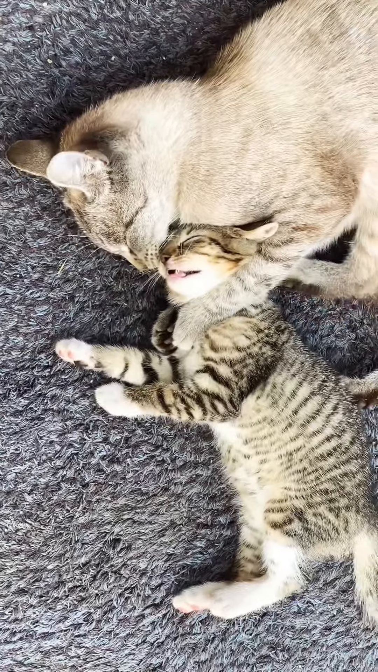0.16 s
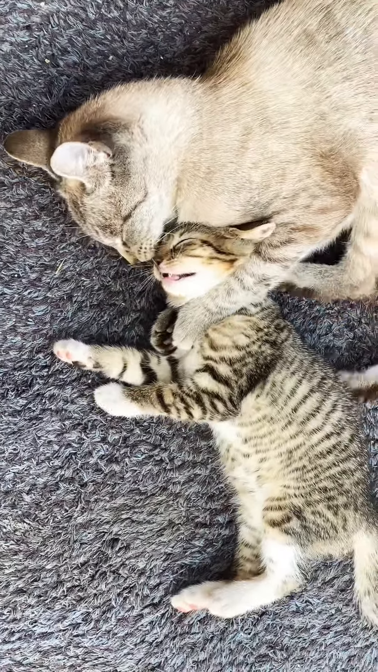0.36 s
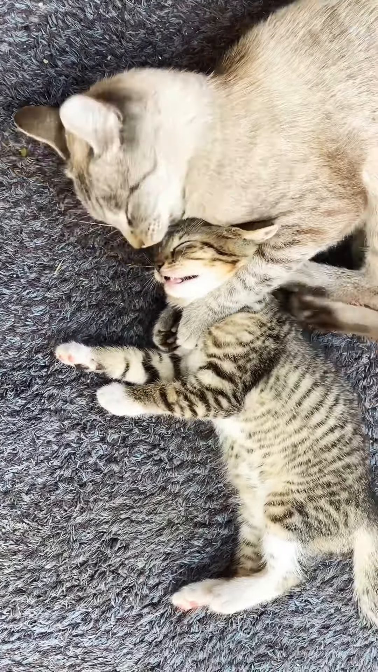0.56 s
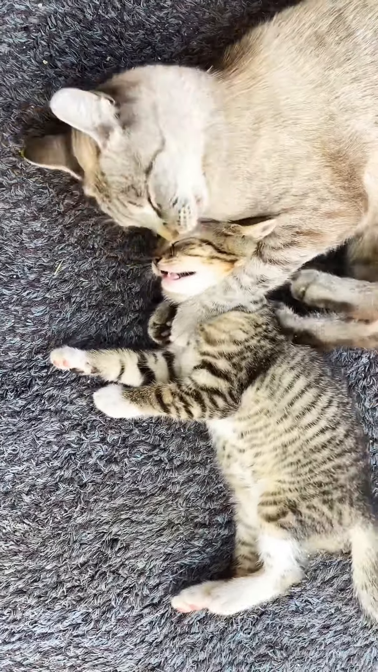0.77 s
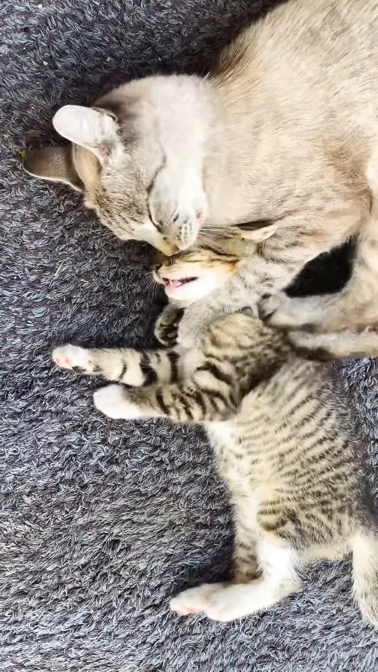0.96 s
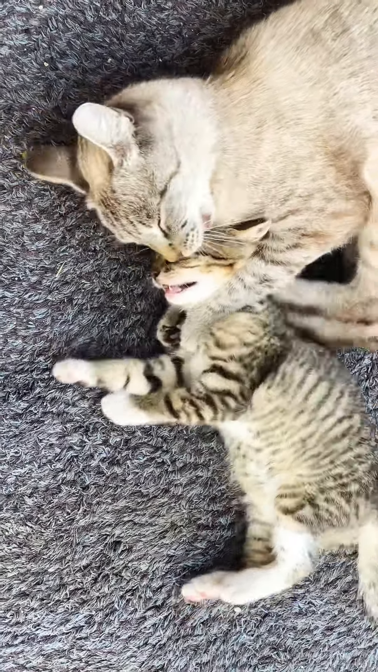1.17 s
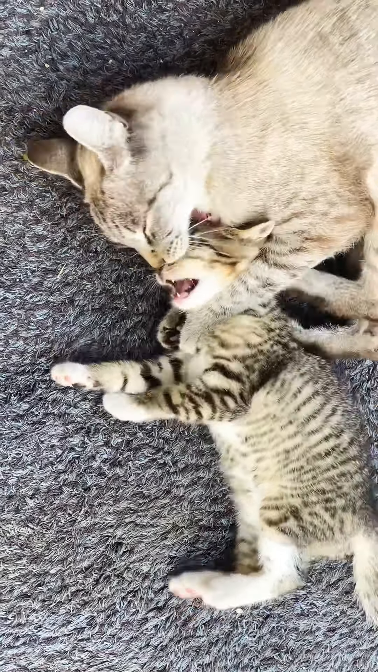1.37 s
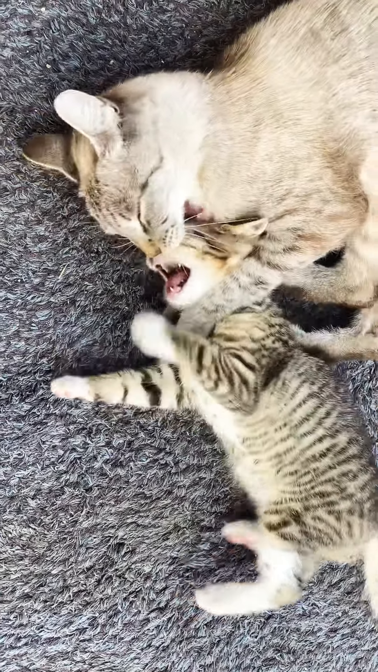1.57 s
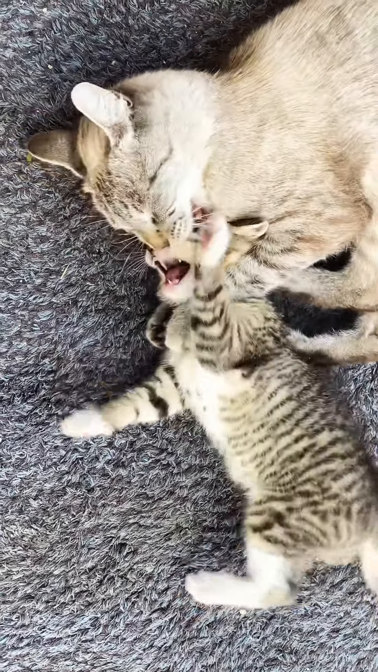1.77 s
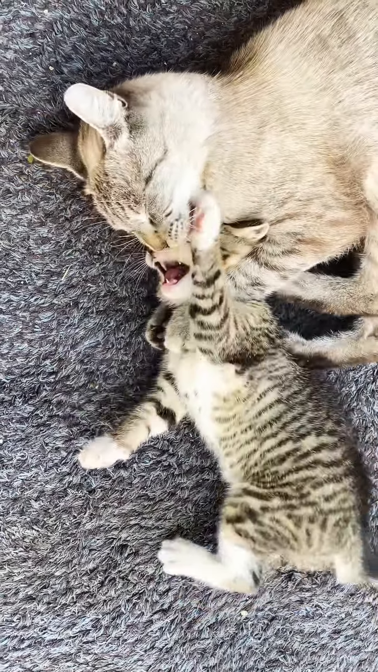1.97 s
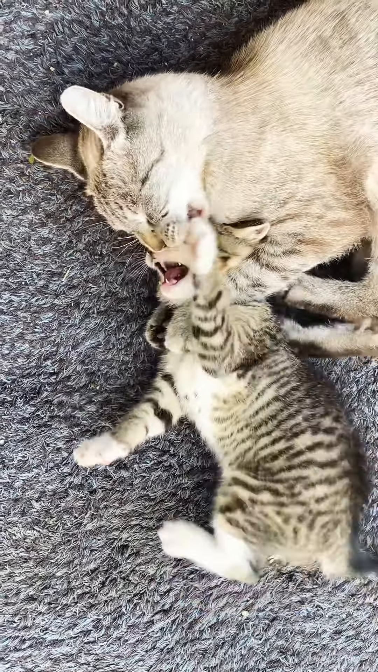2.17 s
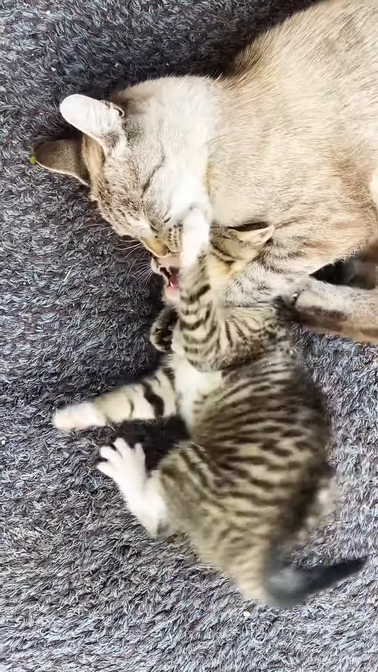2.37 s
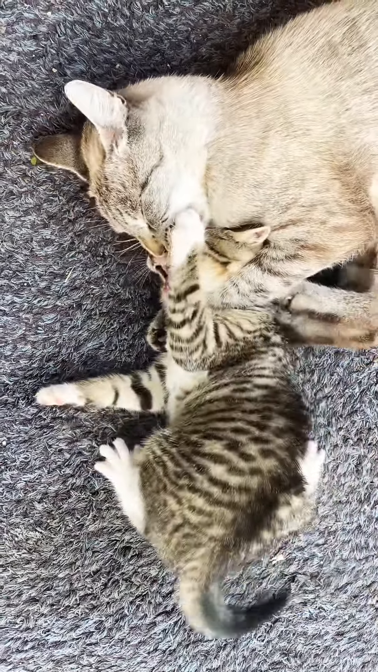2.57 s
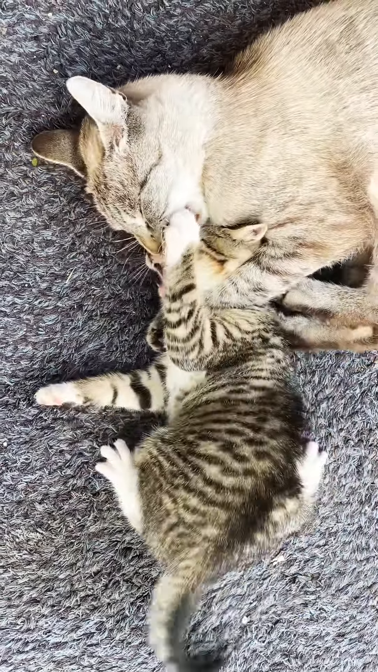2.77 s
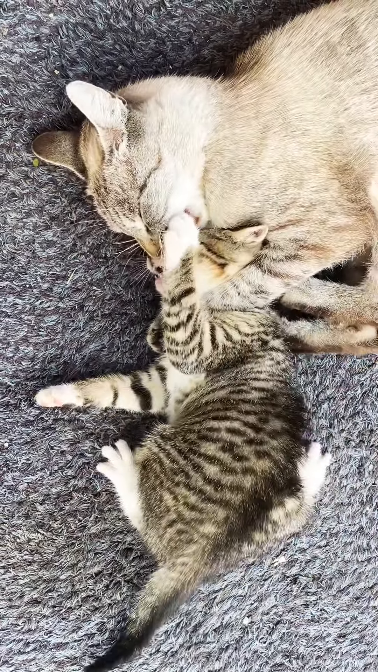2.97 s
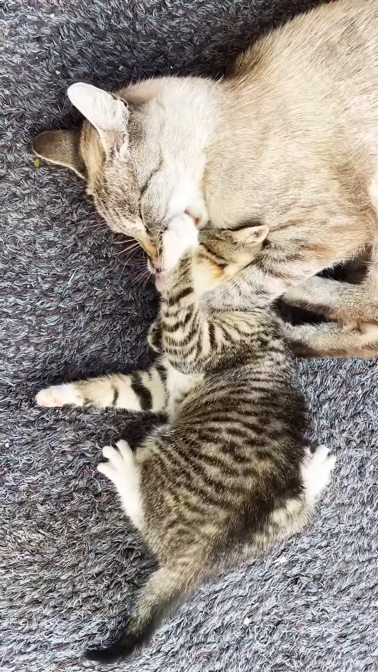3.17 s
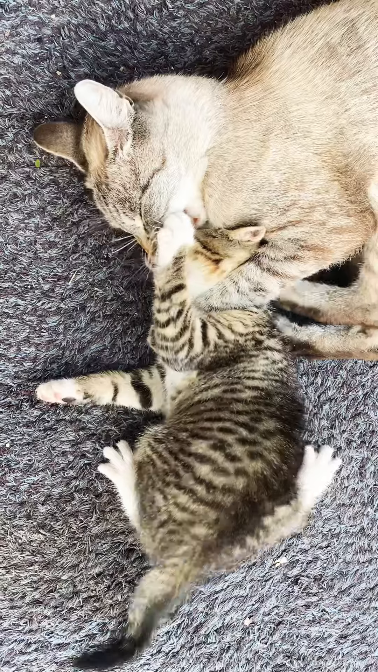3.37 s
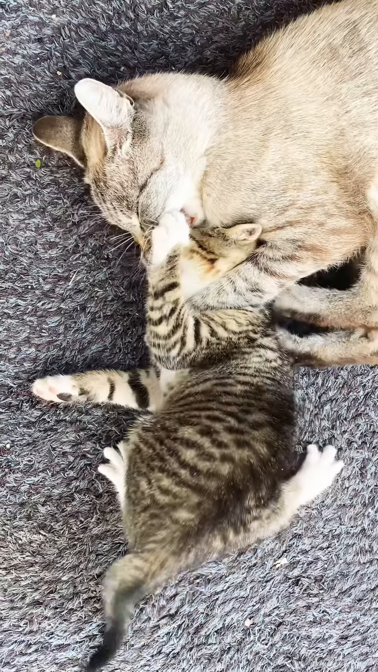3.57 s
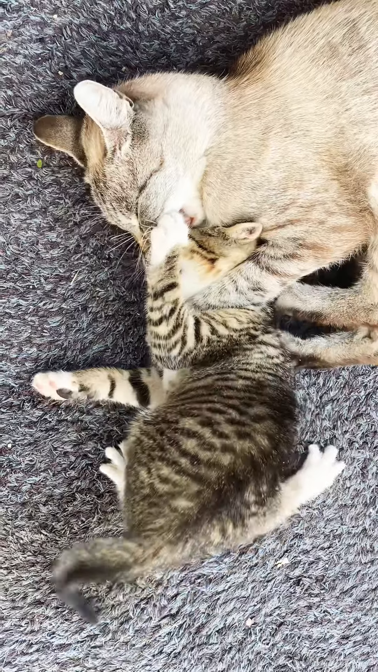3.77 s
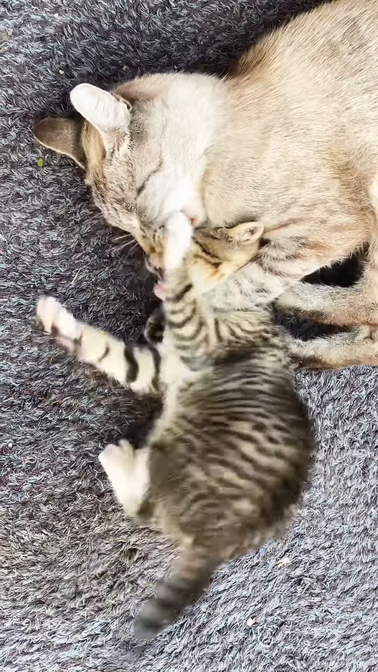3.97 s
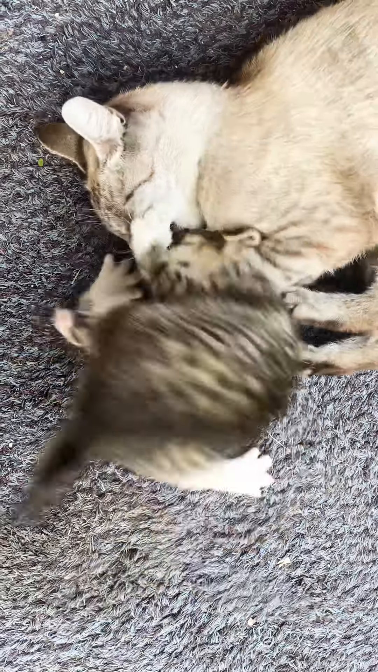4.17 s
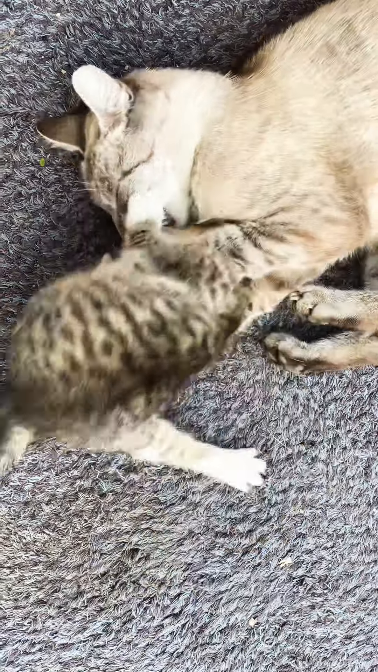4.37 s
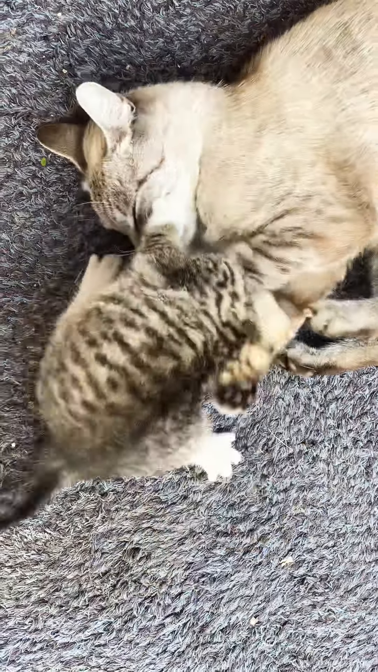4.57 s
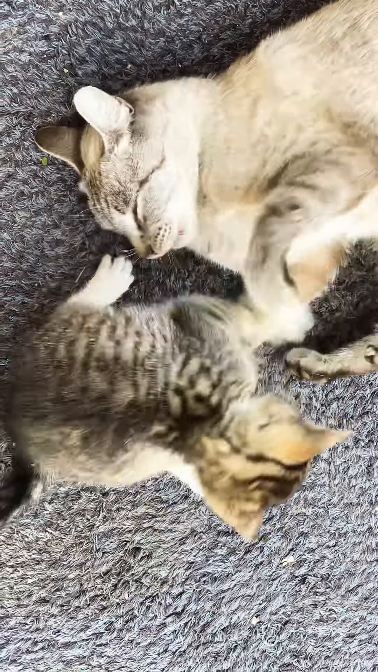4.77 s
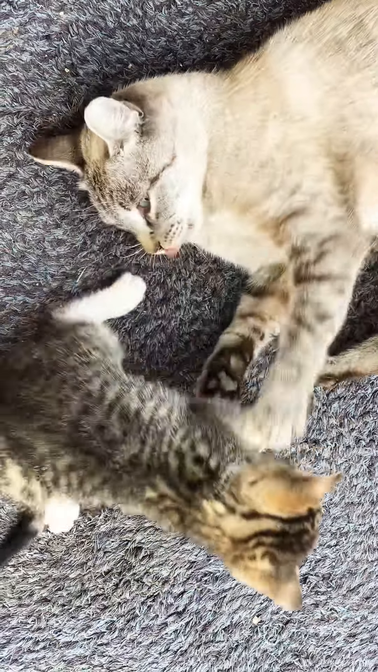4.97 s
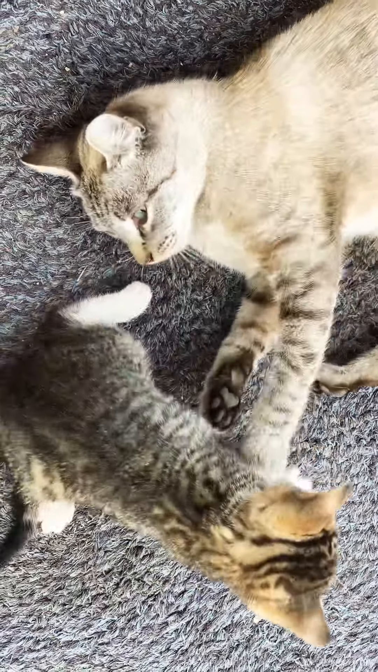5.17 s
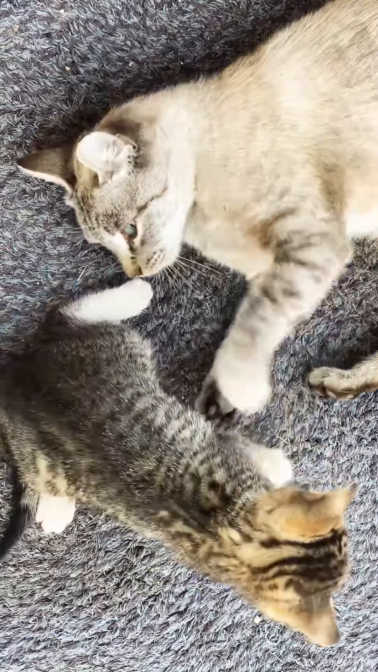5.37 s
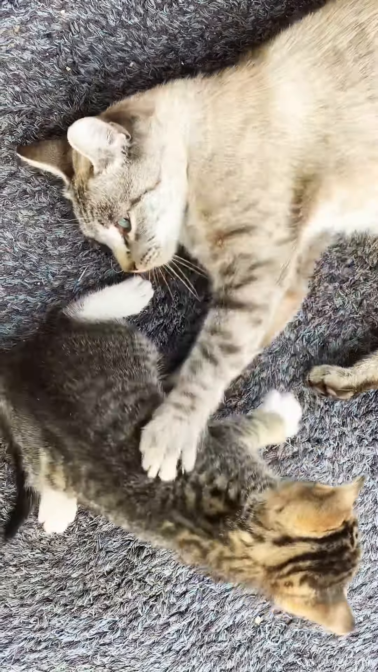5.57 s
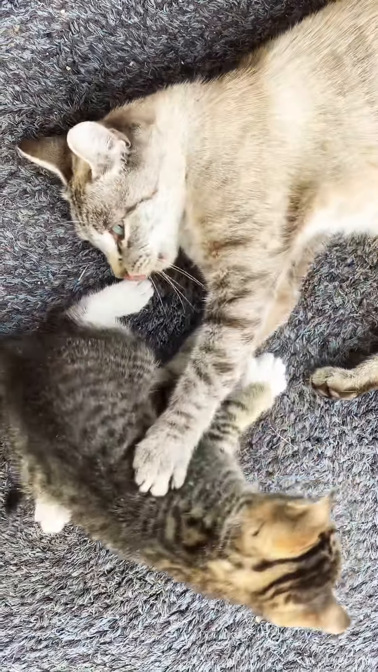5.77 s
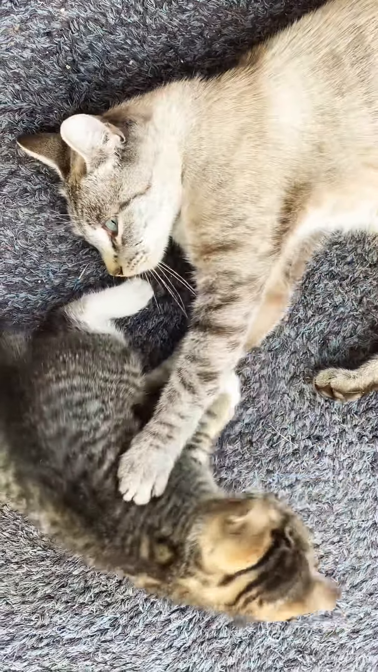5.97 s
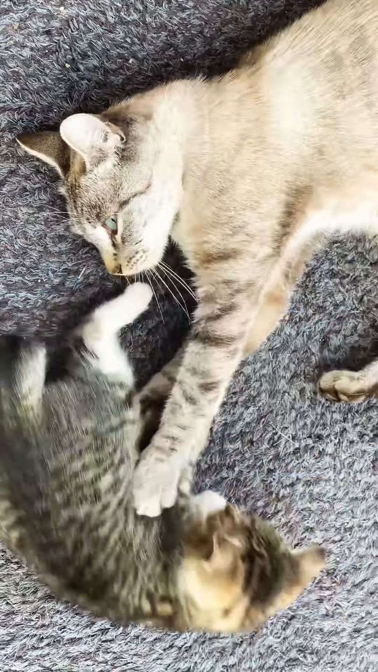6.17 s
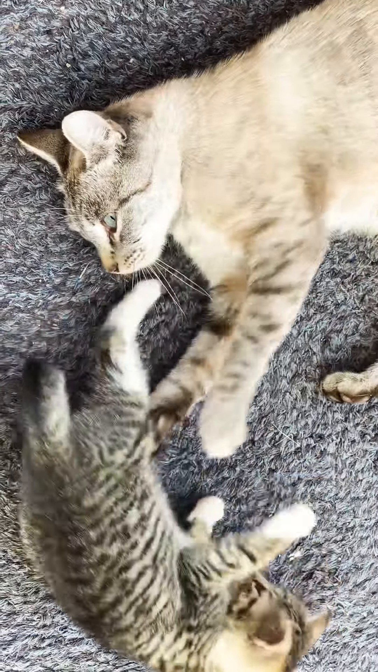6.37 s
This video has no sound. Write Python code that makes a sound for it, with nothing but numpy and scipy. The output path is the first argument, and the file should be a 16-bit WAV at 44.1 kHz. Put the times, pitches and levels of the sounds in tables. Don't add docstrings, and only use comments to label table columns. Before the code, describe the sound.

Two small piercing kitten mews, each starting hoarse and sagging at the end, over faint low rumble, followed by a sniff and light tussling on carpet.

```python
import sys
import numpy as np
from scipy import signal
from scipy.fft import rfft, irfft
from scipy.io import wavfile
from scipy.ndimage import uniform_filter1d

SR = 44100
rng = np.random.default_rng(int(sys.argv[2]) if len(sys.argv) > 2 else 0)


def generate_wav(sig):
    pcm = np.round(np.clip(np.atleast_2d(sig).T, -1, 1) * 32767).astype(np.int16)
    wavfile.write(sys.argv[1], SR, pcm)


def volts_from_db(level):
    exponent = np.asarray(level, float) / 20
    return 10 ** exponent


N = 283122

# hz, level_db
THROAT_COLOUR = [(680, -23.5), (1000, -19.5), (1330, -14), (1700, -21.5), (2050, -19.5), (2500, -24.5),
                 (3300, -7.5), (4200, -3.5), (5200, -4.5), (6000, -14), (7500, -16), (8300, -44),
                 (12800, -47.5), (14500, -42)]


def evened(x):
    return x / np.sqrt(np.mean(x ** 2) + 1e-20)


def read(points, hz):
    f, value = np.transpose(points)
    return np.interp(np.log(hz + 1), np.log(f + 1), value)


def along(rows):
    s, db = np.transpose(rows)
    return volts_from_db(np.interp(np.arange(N) / SR, s, db))


def add(mix, s, sound):
    part = mix[round(s * SR):][:len(sound)]
    part += sound[:len(part)]


def drift(count, size):
    once = uniform_filter1d(rng.standard_normal(count), size)
    return evened(uniform_filter1d(once, size))


def resonate(x, hz, width):
    turn = np.exp(2j * np.pi * np.cumsum(hz * np.ones(len(x))) / SR)
    r = np.exp(-np.pi * width / SR)
    once = signal.lfilter([1 - r], [1, -r], x / turn)
    twice = signal.lfilter([1 - r], [1, -r], once)
    return 2 * (turn * twice).real


def coloured(x, points):
    hz = np.fft.rfftfreq(len(x), 1 / SR)
    colour_db = read([(points[0][0] / 2, -90)] + points, hz)
    return irfft(rfft(x) * volts_from_db(colour_db), len(x))


def bed(points, patchy_db, flicker_db):
    # hz, correlation
    likeness = [(60, 0.79), (130, 0.9), (290, 0.72), (640, -0.52), (1100, -0.27), (1800, 1), (3000, 0.35),
                (10000, 0.83), (13000, .7), (15500, 0.98)]
    frames, hz = N // 256 + 5, np.fft.rfftfreq(1024, 1 / SR)
    a, b, c, d, patches = rng.standard_normal((frames, 513, 5)).T
    patches = evened(uniform_filter1d(uniform_filter1d(patches, 10, 0), 10, 1))
    same = np.clip(read(likeness, hz), -1, 1)[:, None]
    left = a + 1j * b
    right = same * left + np.sqrt(1 - same ** 2) * (c + 1j * d)
    level_db = read(points, hz)[:, None] + patchy_db * patches + flicker_db * drift(frames, size=6)
    z = np.array([left, right]) * volts_from_db(level_db)
    return evened(signal.istft(z, nperseg=1024, noverlap=768)[1][:, :N])


def background():
    # hz, level_db_per_hz
    rumble_colour = [(15, -22), (30, -12.5), (62, 2.5), (100, -7.5), (160, -15), (260, -30.5)]
    # centre_s, peak_db
    jolts = [(.62, -61.5), (.84, -53.5), (1.0, -58.5), (1.359, -60), (2.14, -58), (2.841, -61), (3.62, -60),
             (3.85, -60), (4.13, -60.5), (4.95, -59), (5.25, -61), (5.58, -54), (5.79, -55.5),
             (6.08, -53.5), (6.221, -56.5)]
    # time_s, level_db
    scuff_level = [(0, -100), (.65, -83), (.75, -73), (.9, -95), (4, -80), (4.2, -79.5), (4.6, -78.5),
                   (4.75, -77), (4.95, -77), (5.1, -83.5), (5.4, -77.5), (5.55, -68), (5.75, -75.5),
                   (6, -72.5), (6.15, -77), (6.3, -72), (6.42, -76.5)]
    # hz, level_db_per_hz
    scuff_colour = [(100, -9), (250, -1), (600, 0), (1100, -2), (1600, -21), (3000, -32), (6000, -41)]
    # hz, level_db_per_hz
    air_colour = [(60, -13.5), (130, -2.5), (250, -5), (450, -7), (900, -10), (1500, -18), (2300, -24.5),
                  (4000, -27), (7000, -31.5), (11500, -36), (13500, -29.5), (15100, -24.5), (15800, -30)]
    rumble_db, lumps_db, follows_scuff, air_db = -66.5, 2.5, .3, -74
    jolt_s = 0.028

    t, moving = np.arange(N) / SR, along(scuff_level)
    level = volts_from_db(rumble_db + lumps_db * drift(N, size=2500)) * (moving / volts_from_db(-82.5)) ** follows_scuff
    jolt_power = sum(volts_from_db(2 * db) * np.exp(-((t - s) / jolt_s) ** 2) for s, db in jolts)
    level = np.sqrt(level ** 2 + jolt_power)
    rumble = level * evened(coloured(rng.standard_normal(N), rumble_colour + [(500, -93.5)]))
    scuff = moving * bed(scuff_colour + [(12000, -70)], patchy_db=1.6, flicker_db=1.2)
    air = bed(air_colour, patchy_db=1.1, flicker_db=.6)
    return rumble + scuff + volts_from_db(air_db) * air


def room(x):
    # hz, t60_s
    decay = [(400, 0.53), (2000, 0.31), (5000, .14), (12000, 0.12)]
    taps = np.zeros(SR // 4)
    at = np.arange(200, SR // 4 - 20, 20)
    taps[at + rng.integers(0, 20, at.shape)] = rng.choice([-1., 1.], at.shape)
    hz, t, z = signal.stft(taps, SR, nperseg=256)
    fade = volts_from_db(-60 * t / read(decay, hz)[:, None])
    tail = signal.istft(z * fade, SR, nperseg=256)[1]
    return signal.fftconvolve(x, tail / np.linalg.norm(tail))[:N]


def knock(s, peak_db, hz, width, t60, rise, tail_db):
    t = np.arange(round(.2 * SR)) / SR
    strike = t / rise * np.exp(1 - t / rise)
    rustle = volts_from_db(tail_db - 60 * t / t60) * np.minimum(t / rise, 1)
    blow = (strike + rustle) * resonate(rng.standard_normal(len(t)), hz, width)
    return s - rise, volts_from_db(peak_db) * blow / abs(blow).max()


def sniff():
    # time_s, centre_hz, level_db
    glide = [(4.299, 5830, -102), (4.33, 5300, -85), (4.381, 4560, -82.5), (4.43, 3410, -78.5),
             (4.469, 3170, -89)]
    s, hz, db = np.transpose(glide)
    t = np.arange(s[0], s[-1], 1 / SR)
    hiss = resonate(rng.standard_normal(len(t)), np.interp(t, s, hz), 1200)
    return s[0], volts_from_db(np.interp(t, s, db)) * evened(hiss)


def folds(hz, step, rough, size):
    order = np.arange(step, 16000 / hz.min(), step)[:, None]
    jitter = 0.021 * rough * drift(len(hz), size=60) + 0.0039 * drift(len(hz), size=400)
    turns = np.cumsum(hz * (1 + jitter)) / SR
    chance = rng.standard_normal((len(hz) // 16 + 2, len(order), 2)) @ [1, 1j]
    chance = uniform_filter1d(uniform_filter1d(chance, size, 0), size, 0).T
    share = np.clip(rough * order * hz.mean() / 4000, rough ** 2, .95)
    wander = np.sqrt(1 - share ** 2) + share * chance / np.sqrt(np.mean(abs(chance) ** 2))
    wander = uniform_filter1d(wander[:, np.arange(len(hz)) // 16], size=16, axis=1)
    smear = 1.5 * rng.standard_normal(order.shape)
    wave = (wander * np.exp(1j * (2 * np.pi * order * turns + smear))).real
    return order, turns, np.sqrt(2) * wave * (order * hz < 16000)


def rasp(start, end, from_hz, to_hz, alternate, rough, effort_db, ring_hz):
    count = round((end - start + .004) * SR)
    hz = np.linspace(from_hz, to_hz, count)
    order, _, waves = folds(hz, .5, rough, size=7)
    place = order * hz
    mode_hz = ring_hz * (1 + 0.018 * drift(count, size=200))
    ring = 1 + 2.2 / (1 + ((place - mode_hz) / 300) ** 2)
    chest = volts_from_db(-.35 * (effort_db + 36) * (place < 2400))
    halves = np.where(order % 1, alternate * np.clip(place / 4000, .3, 1), 1)
    sound = (volts_from_db(read(THROAT_COLOUR, place)) * ring * chest * halves * waves).sum(0)
    throb_db = 2.8 * rough * drift(count, size=110)
    return start, volts_from_db(effort_db + throb_db) * evened(sound) * signal.windows.tukey(count, 300 / count)


def tone(rows, let_go_s, slack_hz, puff_db, shy_db):
    # hz, level_db
    teeth = [(2500, 23), (3500, 33), (5500, 3), (6300, -7), (7500, -2.5), (9500, -32), (11200, -11.5),
             (12500, -19), (14000, -16.5), (15800, -18)]
    s, *columns = np.transpose(rows)
    t = np.arange(s[0], s[-1], 1 / SR)
    count = len(t)
    held_hz, held_db, mode_hz = (np.interp(t, s, c) for c in columns)

    gone = .5 + .5 * np.tanh((t - let_go_s) / 0.015 / 2)
    hz = held_hz * (1 - .55 * gone)
    effort_db = held_db - 18.5 * gone ** 2 + 0.37 * drift(count, size=350)
    slack = np.clip((slack_hz - hz) / 150, 0, 1)
    shy = shy_db * np.exp(-((t - s[0]) / .42) ** 2)
    puff = volts_from_db(puff_db) * np.exp(-((t - let_go_s - .004) / .016) ** 2)

    mode_width_hz = 499
    off_mode = (np.outer([3, 4], hz) - mode_hz) / mode_width_hz
    third_db, fourth_db = effort_db - 20 * np.log10(1 + off_mode ** 2)
    low_db = shy * (1 + .35 * drift(count, size=1400)) - 55 + 0.33 * (effort_db + 50.5)
    low_db -= 4 * np.maximum(hz - 970, 0) / 100
    second_db = -73.5 + 0.183 * (third_db + 47) + 0.65 * (low_db - 0.86 * shy + 60.5)
    second_db += 11 * gone ** 0.1 + 2.0 * drift(count, size=500)
    upper_db = -59.5 + 0.33 * (effort_db + 49.5) - 20 * gone ** 0.68 + 2.7 * drift(count, size=700)

    order, turns, waves = folds(hz, 1, .16, size=30)
    high = order[4:]
    dull_db = 2.2 * (high - 5) * np.clip((1120 - hz) / 300, 0, 1) + 0.062 * (high - 5) * (effort_db + 46.5)
    upper = volts_from_db(read(teeth, high * hz) - dull_db)
    upper *= volts_from_db(upper_db) / np.sqrt((upper ** 2).sum(0))
    sound = (volts_from_db([second_db, third_db, fourth_db]) * waves[1:4]).sum(0) + (upper * waves[4:]).sum(0)
    fundamental = volts_from_db(low_db + 1.8 * drift(count, size=700)) * (1 - .5 * slack) + 1.6 * puff
    sound = (1 - slack) * sound + fundamental * waves[0]
    pushed = volts_from_db(third_db + 35 - 29 + 5.2 * drift(count, size=300))
    sound *= 1 + np.minimum(pushed, .2) * np.cos(np.pi * turns)

    air = rng.standard_normal(count)
    leak = volts_from_db(np.maximum(third_db, fourth_db) - 40)
    escaping = slack * volts_from_db(upper_db - 9.5 + 18 * gone) + 0.89 * puff
    sound += (escaping + leak) * evened(coloured(air, THROAT_COLOUR) + volts_from_db(-15) * air)
    sound += leak * volts_from_db(12 + 5.44 * drift(count, size=900)) * evened(resonate(air, 3.5 * hz, 450))
    chest_air = evened(resonate(air, 933, 500) + .6 * resonate(air, 500, 300))
    sound += (.45 * slack * volts_from_db(low_db) + .6 * puff) * chest_air

    sound *= 1 - gone * np.clip(1 - (s[-1] - t) / .03, 0, 1)
    return s[0], sound * signal.windows.tukey(count, 0.009 / (s[-1] - s[0]))


def scene():
    # time_s, held_pitch_hz, effort_db, throat_mode_hz
    first_tone = [(1.762, 1252, -43, 4590), (1.919, 1218, -53.5, 4230), (2.014, 1269, -45, 4300),
                  (2.229, 1137, -58.5, 4130), (2.33, 1104, -53, 3480), (2.471, 1168, -46.5, 4270),
                  (2.604, 1129, -46.5, 4000), (2.702, 1061, -50.5, 3960), (2.87, 990.6, -58.5, 3734)]
    second_rise = [(3.152, 436, -73.5, 4320), (3.186, 643, -56.5, 4220), (3.213, 860, -52, 4100),
                   (3.227, 1026, -42, 4400), (3.247, 1166, -41, 4220), (3.277, 1280, -32.5, 4680)]
    second_tone = [(3.503, 1169, -38, 4600), (3.587, 1182, -35.5, 4380), (3.689, 1272, -29, 4610),
                   (3.79, 1267, -28, 4500), (3.841, 1214, -29.5, 4310), (3.887, 1246, -30, 4340),
                   (3.95, 1194, -37, 4200), (3.975, 1252, -34, 4250), (4.108, 1119, -63, 3240)]
    # let_go_s, slack_below_hz, puff_db, fundamental_at_start_db
    endings = [
        (2.808, 960, -53, -12),
        (9, 700, -90, -3),
        (4.076, 980, -72, -1.5),
    ]
    # start_s, from_hz, to_hz, effort_db, throat_mode_hz, voice
    rasps = [(1.424, 774, 880, -52, 4530, "rough"), (1.452, 900, 943, -44, 4300, "rough"),
             (1.461, 958, 934, -59, 4360, "husky"), (1.479, 890, 981.6, -64.5, 4160, "rough"),
             (1.511, 970, 1100, -58.5, 3330, "torn"), (1.547, 776, 697, -52, 4200, "torn"),
             (1.558, 677, 691, -42.5, 4390, "torn"), (1.627, 680, 669.8, -41.5, 4400, "torn"),
             (1.672, 729, 812, -38.5, 4210, "clear"), (1.699, 655, 604, -42, 4540, "rough"),
             (1.765, 646, 610, -63, 3860, "torn"), (3.273, 679, 662, -35, 4550, "split"),
             (3.329, 661, 660, -37, 4690, "rough"), (3.399, 693, 682.6, -39.5, 5160, "torn"),
             (3.41, 706, 693.3, -32, 4370, "clear"), (3.429, 658, 667, -36.5, 5300, "clear"),
             (3.447, 615, 630, -40, 4540, "clear"), (3.478, 594, 580.7, -40.5, 4370, "rough")]
    voices = {"clear": (.09, .24), "husky": (.2, .5), "split": (.6, .55), "rough": (.3, .63),
              "torn": (.45, .8)}
    # start_s, peak_db, centre_hz, width_hz, t60_s
    ticks = [(0.516, -53.5, 5700, 4900, 0.16), (.575, -69, 11000, 2000, .03),
             (.66, -71.5, 5500, 1500, 0.23), (0.772, -60.5, 9100, 3000, .06),
             (0.775, -63, 1900, 1490, 0.044), (4.677, -63, 9450, 3056, .08),
             (4.862, -52.5, 2190, 800, 0.027), (4.868, -62.5, 6940, 1496, 0.048),
             (4.893, -62, 6650, 1500, 0.037), (4.899, -57.5, 7240, 1490, 0.17),
             (4.899, -61.5, 2770, 2910, 0.43), (4.928, -62.5, 1690, 1210, 0.157),
             (5.465, -60, 2990, 1187, 0.18), (5.466, -65, 6460, 3020, 0.042),
             (5.501, -69.5, 2840, 894, 0.092), (5.558, -75, 2890, 594, 0.037),
             (5.586, -63.5, 7200, 2000, 0.053), (5.612, -83.5, 3910, 490, .03),
             (5.953, -77.5, 3600, 397.6, 0.035)]
    # start_s, peak_db, centre_hz, width_hz,
    # t60_s
    thumps = [(.822, -50, 147, 195, .1), (.823, -59, 593, 300, .09), (1.057, -64, 580, 500, .2),
              (3.155, -60, 915, 300, .04), (4.02, -64, 400, 300, .2), (4.06, -68, 1900, 1200, .4),
              (4.74, -72, 1210, 2010, .095), (5.49, -67, 1047, 200, .14), (5.56, -55, 200, 298, .16),
              (5.58, -65.5, 500, 403, .1), (5.907, -60, 522, 251, .056), (6.015, -64.5, 398, 498, .15)]
    last_rasp_s = 0.03

    near = np.zeros(N)
    for rows, ending in zip((first_tone, second_rise, second_tone), endings):
        add(near, *tone(rows, *ending))
    for row, later in zip(rasps, rasps[1:] + [[N / SR]]):
        start, from_hz, to_hz, effort_db, ring_hz, voice = row
        end = later[0] if later[0] - start < .5 else start + last_rasp_s
        add(near, *rasp(start, end, from_hz, to_hz, *voices[voice], effort_db, ring_hz))
    for row in ticks:
        add(near, *knock(*row, rise=0.0011, tail_db=-7.5))
    for row in thumps:
        add(near, *knock(*row, rise=.0033, tail_db=-12))
    add(near, *sniff())
    return near + volts_from_db(-18) * room(near) + background()


def top_cut(x):
    return signal.sosfilt(signal.butter(12, 16080, fs=SR, output="sos"), x)


def record(dry):
    # hz, lead_rad
    phase_lead = [(100, 0), (1900, 0.56), (2500, 0.37), (4000, 0.51), (4500, 1.5), (5000, 2), (5700, 0.99),
                  (7600, 3.5), (8200, 3.5), (11000, 3.5), (13300, 4.5), (15300, 5), (16000, 4)]
    half_lead = read(phase_lead, np.fft.rfftfreq(N, 1 / SR)) / 2
    ports = irfft(rfft(dry) * np.exp(1j * np.array([half_lead, -half_lead])), N)
    return top_cut(ports)


dry = scene()
out = record(dry)
generate_wav(out)
```